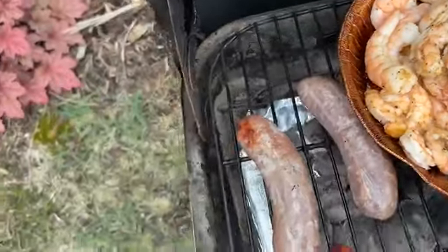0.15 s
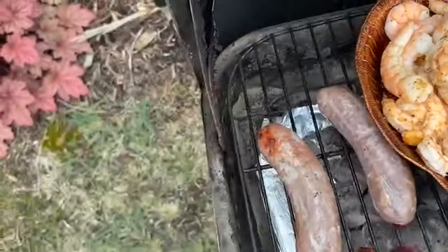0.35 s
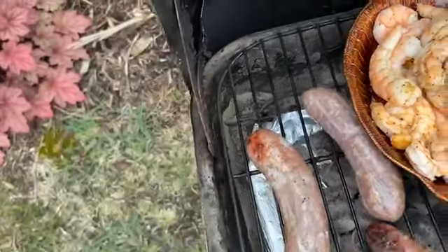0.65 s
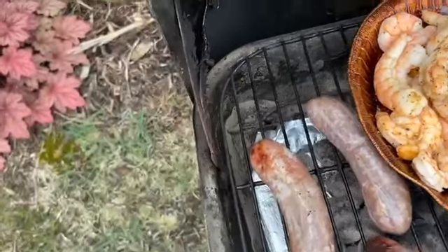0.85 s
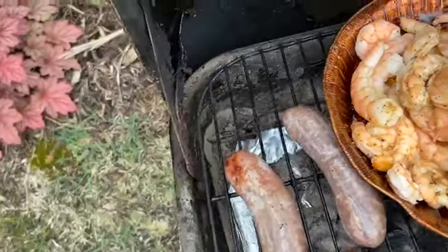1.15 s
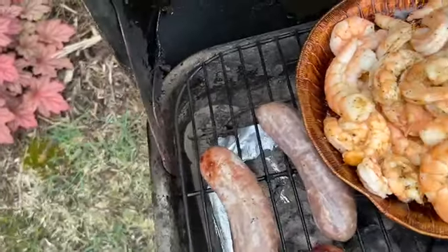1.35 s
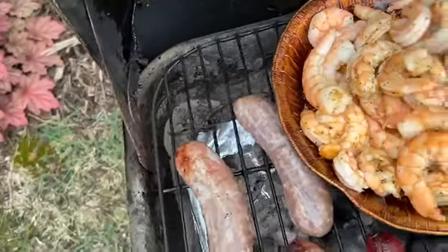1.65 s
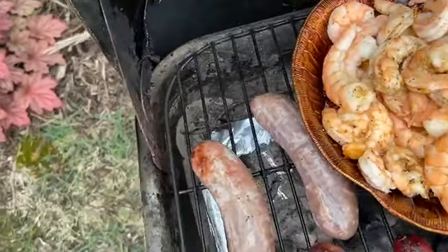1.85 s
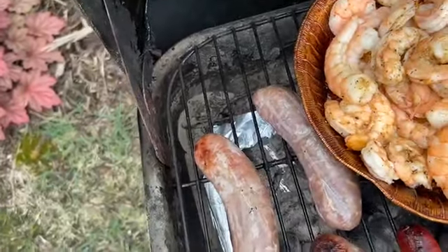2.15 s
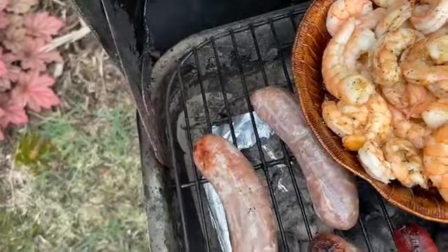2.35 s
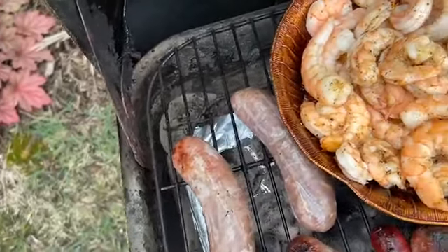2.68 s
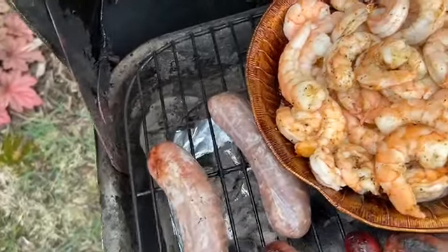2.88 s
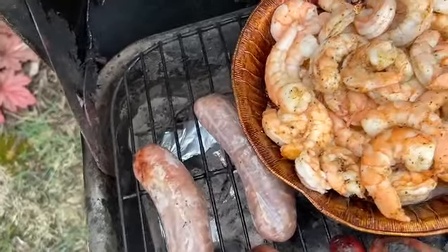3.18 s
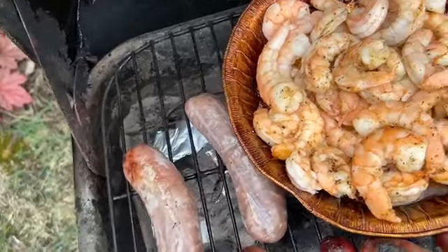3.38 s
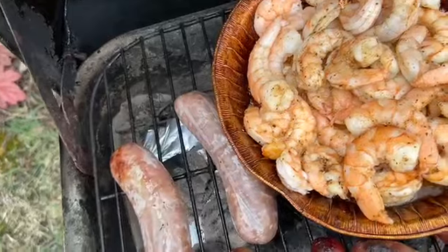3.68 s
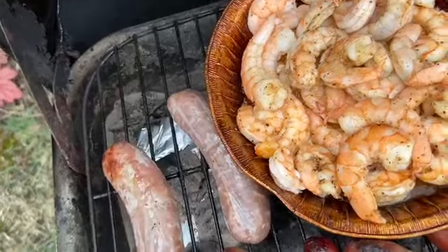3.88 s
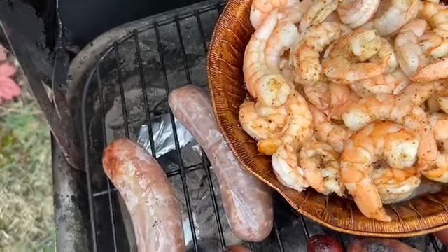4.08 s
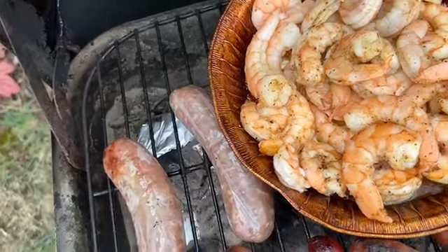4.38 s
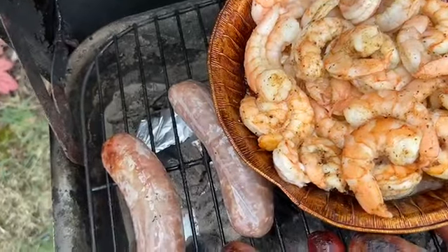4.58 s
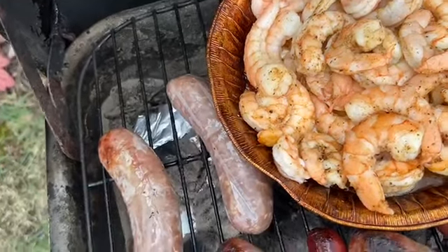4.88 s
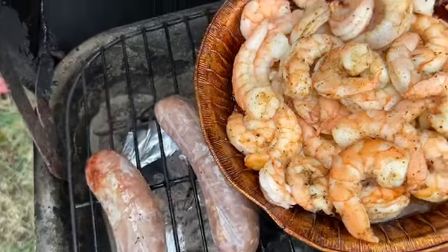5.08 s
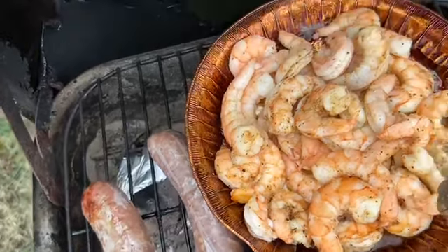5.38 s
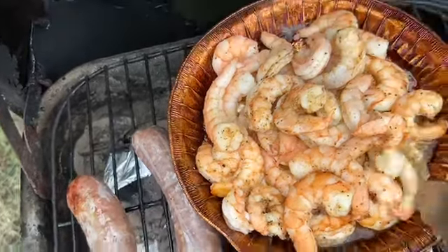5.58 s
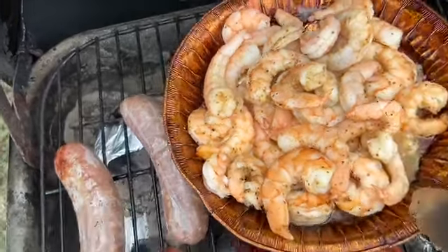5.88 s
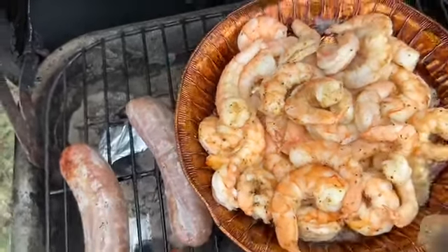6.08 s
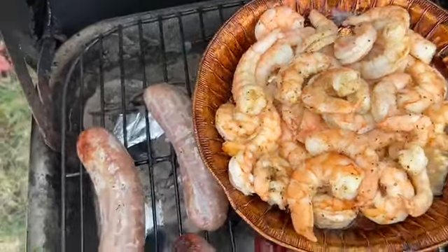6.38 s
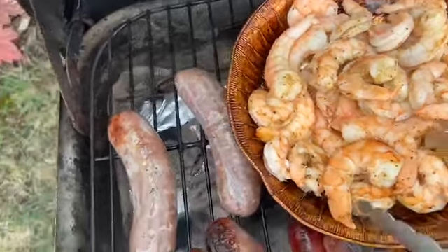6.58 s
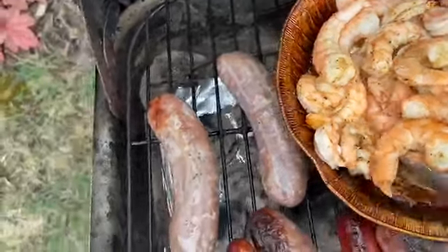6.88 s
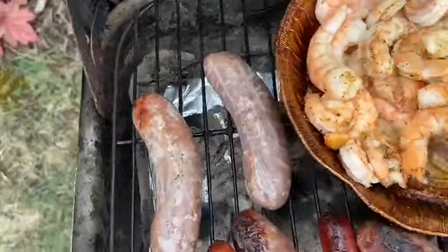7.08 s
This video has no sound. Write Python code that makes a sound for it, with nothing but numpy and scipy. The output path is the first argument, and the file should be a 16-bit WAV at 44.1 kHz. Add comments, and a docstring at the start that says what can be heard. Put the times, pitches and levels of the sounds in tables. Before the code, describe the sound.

A low machine hum and soft outdoor rumble run throughout, with faint charcoal-grill sizzle and occasional spits of fat. Tongs knock the grate lightly, then scrape and clang it harder, ringing the sheet-metal bowl. Later, wet rubs and short hollow clacks come from a dish of shrimp very close to the microphone, the loudest past the middle, with another strong clack near the end.

```python
"""A machine hums throughout over a low outdoor rumble, and sausages sizzle faintly on a small charcoal
grill. Metal tongs knock and scrape on the grate, which rings the sheet-metal bowl; this alternates with
rubs and clacks in a dish of shrimp close to the microphone. Fat spits now and then.
Hum is made of sine waves, sizzle and spits of tiny clicks and noise bursts; struck or rubbed metal is
made of fading sine waves and noise, set going by single blows or streams of random clicks."""
import sys
import numpy as np
from scipy import signal
from scipy.fft import rfft, irfft, next_fast_len
from scipy.io import wavfile
from scipy.ndimage import uniform_filter1d, map_coordinates

SR = 44100
rng = np.random.default_rng(int(sys.argv[2]) if len(sys.argv) > 2 else 0)


def wav_out(sig):
    """Save sig, one row per channel (or a flat mono array), as 16-bit PCM at SR to the path in sys.argv[1]."""
    wavfile.write(sys.argv[1], SR, np.round(np.clip(np.atleast_2d(sig).T, -1, 1) * 32767).astype(np.int16))


N = 319725
TIME = np.arange(N) / SR  # seconds
# Table levels set the balance; the functions trim, color and pan them further.
# In every table of modes, fade_s is the time to fall by 60 dB.


def undb(db):
    """Turn decibels into a gain."""
    return 10 ** (np.asarray(db) / 20)


def unit(x):
    """Scale a sound to an rms level of 1."""
    return x / np.sqrt(np.mean(x ** 2))


def at_hz(points, hz):
    """Read a curve of (frequency, value) points on a log-frequency axis."""
    f, value = np.transpose(points)
    return np.interp(np.log(np.maximum(hz, 1)), np.log(f), value)


def colour(x, points, size=8192):
    """Filter to a (pitch_hz, level_db) spectrum, with no sound before its cause (minimum phase)."""
    log_gain = at_hz(points, np.fft.rfftfreq(size, 1 / SR)) * np.log(10) / 20
    cepstrum = irfft(log_gain)
    # folding the second half onto the first puts the response after the start
    cepstrum[1:size // 2] *= 2
    cepstrum[size // 2 + 1:] = 0
    response = irfft(np.exp(rfft(cepstrum)))
    return signal.fftconvolve(x, response)[:len(x)]


def band(x, lo_hz, hi_hz, order=2):
    """Keep only the sound between two frequencies."""
    edges = [lo_hz, min(hi_hz, SR / 2 - 1)]
    return signal.sosfilt(signal.butter(order, edges, "band", fs=SR, output="sos"), x)


def walk(rate_hz):
    """A smooth random wander with an rms of 1, from rate_hz new values each second."""
    k = int(SR / rate_hz)
    steps = np.repeat(rng.standard_normal(N // k + 1), k)
    smooth = uniform_filter1d(uniform_filter1d(steps, k), k)
    return unit(smooth[:N])


def stroke(start, length, swell_db, attack_s, release_s):
    """Gain of one sliding contact: it bites, presses steadily harder or softer, then lets go."""
    t = TIME - start
    bite = 1 - np.exp(-np.maximum(t, 0) / attack_s)
    pressure = undb(swell_db * (np.clip(t / length, 0, 1) - .5))
    let_go = np.exp(-np.maximum(t - length, 0) / release_s)
    return bite * pressure * let_go


def add(track, s, sound):
    """Mix a sound into a track at time s, in seconds."""
    start = int(s * SR)
    track[start:start + len(sound)] += sound[:N - start]


def ring(modes, t):
    """Fading sine waves, the modes of struck metal; neighbours swing in opposite directions."""
    out = 0
    for k, (hz, db, fade_s) in enumerate(modes):
        out = out + (-1) ** k * undb(db - 60 * t / fade_s) * np.sin(2 * np.pi * hz * t)
    return out


def wash(bands, t):
    """Modes too dense to tell apart: octaves of noise, each dying at its own pace."""
    out = 0
    for hz, db, fade_s in bands:
        octave = band(rng.standard_normal(len(t)), hz / np.sqrt(2), hz * np.sqrt(2))
        out = out + undb(db - 60 * t / fade_s) * unit(octave)
    return out


def grains(rate_hz, spread_db):
    """Random tiny clicks, rate_hz each second on average, mostly weak with a few strong ones."""
    size = undb(spread_db * np.minimum(rng.exponential(size=N), 5))
    return unit((rng.random(N) < rate_hz / SR) * size * rng.choice([-1, 1], N))


def blow(response, db, bright_db, split_hz):
    """Shape one blow: harder contact puts more of its energy above the split frequency."""
    low = signal.sosfilt(signal.butter(4, split_hz, "low", fs=SR, output="sos"), response)
    high = signal.sosfilt(signal.butter(4, split_hz, "high", fs=SR, output="sos"), response)
    # loudest 4 ms of each part
    peak_low, peak_high = (np.sqrt(uniform_filter1d(part ** 2, size=176).max()) for part in (low, high))
    return undb(db) * (low / peak_low + undb(bright_db) * high / peak_high)


# steady tones of the machine: pitch_hz, level_db (average rms)
MACHINE_HUM = [(119.8, -48), (239.6, -82.5), (299.3, -73), (359.5, -77), (538.7, -80)]
# tone of the outdoor rumble: pitch_hz, level_db (relative)
YARD_COLOUR = [(10, -34.5), (25, -14), (50, -1), (80, 2.5), (115, 0.5), (160, -3.5), (220, -11), (310, -17),
               (420, -21.5), (540, -21), (800, -26), (1200, -30.5), (1900, -38.5), (6000, -64)]


def yard(rumble_db=-50.0, side_db=-17, waver_db=0.64):
    """A machine's sine tones waver slightly over a low rumble of coloured noise."""
    hum = 0
    for hz, db in MACHINE_HUM:
        level = np.sqrt(2) * undb(db + waver_db * walk(1.8))
        hum = hum + level * np.sin(2 * np.pi * hz * TIME + 0.059 * walk(1.4))
    mid, side = (unit(colour(rng.standard_normal(N), YARD_COLOUR)) for _ in range(2))
    # the side noise is opposite in left and right, which widens the rumble
    return hum + undb(rumble_db) * (mid + undb(side_db) * side * np.array([[1], [-1]]))


# loudness of the sizzle over time: time_s, level_db (before trim)
SIZZLE_LEVEL = [(0.0, -71.5), (0.42, -71.5), (0.6, -58), (0.91, -68), (1.39, -61), (2.3, -61.5),
                (2.6, -64.5), (3.35, -71), (4.15, -68), (4.42, -72), (4.85, -66), (5.1, -62.5), (5.23, -70),
                (5.45, -68.5), (5.72, -62), (6.24, -63.5), (6.55, -73), (7.25, -62.5)]
# loud noise bursts: start_s, level_db (before trim); the one at 3.4285 s is the bright tick
# at the top of a grate knock, the others are the loudest spits of fat
LOUD_BURSTS = [(0.4831, -30.5), (0.831, -43), (2.8397, -47), (3.4285, -34), (3.5578, -47), (4.1055, -37.5),
               (4.3151, -46.5), (4.512, -44), (4.6453, -44.5), (4.7825, -46.5), (4.8828, -47.5),
               (4.9287, -45), (5.1237, -45), (5.2803, -49.5), (6.0395, -39.5), (6.1392, -39.5),
               (6.213, -40), (6.2813, -41.5), (7.053, -40.5), (7.1714, -39.5)]
# tone of sizzle and bursts: pitch_hz, level_db (relative)
SIZZLE_COLOUR = [(300, -29), (1200, 2), (1900, -6.5), (2300, 2), (3300, 4), (3650, 1.5), (4300, 3),
                 (6200, -2), (8000, 2.5), (11500, -5), (16000, 4)]


def sizzle_and_bursts(gain_db=4, burst_db=-2, burst_s=0.0051, flutter_db=0.76, crackle_db=-9,
                      small_spit_db=-51, small_spread_db=2, count=20):
    """Bursting beads of fat, a sparser crackle, small spits at random and single louder bursts."""
    s, db = np.transpose(SIZZLE_LEVEL)
    t = TIME[:SR // 20]
    # a snap, then its scatter inside the bowl
    snap = (1 - np.exp(-t / 0.00039)) * (np.exp(-t / burst_s) + 0.091 * np.exp(-t / 0.0128))
    pops = np.abs(grains(rate_hz=40, spread_db=1.5))
    crackle = signal.fftconvolve(pops, snap)[:N] * rng.standard_normal(N)
    beads = grains(rate_hz=6200, spread_db=4.0)
    out = beads + undb(crackle_db) * unit(crackle)
    out *= undb(np.interp(TIME, s, db) + gain_db + flutter_db * walk(28))
    small_spits = [(when * TIME[-1], small_spit_db + small_spread_db * (2 * size - 1))
                   for when, size in rng.random((count, 2))]
    for s, db in list(LOUD_BURSTS) + small_spits:
        add(out, s, undb(db + burst_db) * snap * rng.standard_normal(len(t)))
    return colour(out, SIZZLE_COLOUR)


# tongs drag along the bars: start_s, length_s, level_db (before trims), swell_db (over the stroke)
GRATE_DRAGS = [(1.18, 0.059, -43, 3), (1.244, 0.026, -32, 17), (1.266, 0.04, -33, 3.5)]
# tone of the dragging rasp: pitch_hz, level_db (relative)
DRAG_COLOUR = [(100, -7), (300, -9), (1400, -4), (2000, -10.5), (3200, -7.5), (5500, -10.5), (8000, -8),
               (11000, -16.5), (16000, -13.5)]
# ringing of grate and bowl walls, also used by the knocks: pitch_hz, level_db (relative), fade_s
GRILL_MODES = [(433.6, 3, 0.3), (467.5, 4, 0.2), (509, -7, 0.81), (581, -17, 0.11), (679, 6, 0.19),
               (732, -5.5, 0.37), (795, -8.5, 0.17), (902, -2.5, 0.085), (984, -3, 0.13),
               (1271, -13.5, 0.31), (1397, -5.5, 0.15), (1937, -12, 0.22), (2880, -11, 0.099),
               (3138, -7, 0.13), (3470, -19, 0.15), (4080, -2.5, 0.067)]
# the crowd of weaker sheet-metal modes, also for the knocks: pitch_hz, level_db (relative), fade_s
GRILL_WASH = [(393, 0.5, 0.34), (850, -9, 0.36), (1590, -10, 0.25), (3060, -3, .13), (6800, -7.5, 0.14),
              (13200, -25, 0.36)]
# deep ringing of the grill bowl, also for the knocks: pitch_hz, level_db (relative), fade_s
BOWL_MODES = [(184.4, -1, 0.56), (205, 1, 0.8), (236.4, 1, 0.94), (316.3, 8, 0.31), (331, 10.5, 0.19),
              (348, -22, 0.54)]


def grate_drag(rasp_db=11, walls_db=-2, wash_db=3, deep_db=-9, attack_s=0.004, release_s=0.013):
    """Steel sticks and slips along the bars; the bowl rings on behind the rasp."""
    t = TIME[:SR]
    strokes = [undb(db) * stroke(s, length, swell_db, attack_s, release_s)
               for s, length, db, swell_db in GRATE_DRAGS]
    press = np.max(strokes, axis=0)
    slips = grains(rate_hz=8400, spread_db=2.5) * undb(1.5 * walk(120)) * press
    walls = unit(ring(GRILL_MODES, t)) + undb(wash_db) * unit(wash(GRILL_WASH, t))
    deep = ring(BOWL_MODES, t)
    bowl = undb(walls_db) * walls / np.linalg.norm(walls) + undb(deep_db) * deep / np.linalg.norm(deep)
    rung = signal.fftconvolve(band(slips, 110, 4500, order=1), bowl)[:N]
    return undb(rasp_db) * colour(slips, DRAG_COLOUR) + rung


# knocks on the grate: start_s, body_db (before trim), then levels relative to the body, before trims: #
# clatter_db (bright part), boom_db (whole grill), bowl_db (low ring); spot_hz (favoured by the struck spot); #
# all rows are tongs knocking, except the last at 7.172 s: the dish pressed down on the grill, a soft thud with
# a deep boom
GRATE_KNOCKS = [(0.4447, -29.5, -3.5, -7, -8.5, 920), (0.503, -25.5, -12.5, -14, -13.5, 870),
                (1.4712, -17, -5, -22.5, -15.5, 630), (1.504, -18, -6, -12.5, -21.5, 663),
                (2.942, -31, -27, -36, -3.5, 330), (3.395, -38, -10, -5, -6.5, 330),
                (3.428, -31, -10, -35, -5.5, 355), (7.152, -31.5, -23.5, -28, -11, 640),
                (7.172, -57.5, -11, 23, -10, 320)]
BOOM_HZ, BOOM_FADE_S = 106.1, 0.85
SPOT_DB, SPOT_SPAN = 2.5, 1.25  # lift of the favoured modes; frequency ratio over which it fades


def grate_knocks(gain_db=-2, bright_db=2, chatter_s=0.019, chatter_db=-4, wash_db=-1, swell_s=0.0018,
                 crack_db=-8, crack_s=0.0042, tick_db=-12, boom_db=-4, deep_db=-8):
    """The tips crack on the bars, the loose grate chatters on its rests and the bowl rings."""
    out, t = np.zeros(N), TIME[:SR]
    walls, deep = ring(GRILL_MODES, t), ring(BOWL_MODES, t)
    boom = ring([(BOOM_HZ, 0, BOOM_FADE_S)], t)
    for s, db, hard_db, heavy_db, low_db, spot_hz in GRATE_KNOCKS:
        chatter = band(rng.standard_normal(len(t)) * np.exp(-t / chatter_s), 660, 14500)
        # a single click is the first hit; noise follows as chatter
        force = undb(chatter_db) * chatter / np.linalg.norm(chatter) + (t == 0)
        body = signal.fftconvolve(force, walls)[:len(t)]
        crack = band(rng.standard_normal(len(t)) * np.exp(-t / crack_s), 330, 4200, order=1)
        tick = band(rng.standard_normal(len(t)) * np.exp(-t / crack_s), 3400, 16000)
        contact = undb(crack_db) * unit(crack) + undb(tick_db) * unit(tick)
        response = unit(body) + undb(wash_db) * unit(wash(GRILL_WASH, t)) + contact
        # each spot on the grate drives some modes more than others
        response = colour(response, [(spot_hz / SPOT_SPAN, 0), (spot_hz, SPOT_DB), (spot_hz * SPOT_SPAN, 0)])
        # the bowl takes a few milliseconds to pick up the motion of the grate
        swell = 1 - np.exp(-(t / swell_s) ** 1.1)
        lows = undb(db + heavy_db + boom_db) * boom + undb(db + low_db + deep_db) * deep
        knock = blow(response * swell, db + gain_db, hard_db + bright_db, split_hz=1980)
        add(out, s, knock + lows * swell)
    return out


# strokes in the dish: start_s, length_s, body_db (before trim), swell_db (over the stroke),
# then levels relative to the body, before trims: hiss_db, squeak_db (blades), groan_db (arms);
# the one at 5.852 s is the low body of the clack at 5.855 s, in the others the tongs rub
DISH_STROKES = [(0.12, 0.13, -63, -9, -2, -17, -13), (2.377, 0.025, -42.5, -2, -6.5, 0, -4),
                (2.411, 0.067, -40.5, -5, -13, -13.5, -9), (2.516, 0.06, -51, 5.5, -7, -3.5, 5.5),
                (4.051, 0.07, -58.5, 5, -0.5, -5, -3), (5.667, 0.12, -44, 8.5, -2, -5, -3),
                (5.795, 0.183, -42, -3, -9.5, -6.5, -17), (5.852, 0.0144, -27.5, -10, -27, -25, -28),
                (5.975, 0.071, -50, -3, -12, -12, -20), (6.048, 0.043, -47.5, -18, -2.5, -18, -20),
                (6.671, 0.023, -32.5, 0, -6, -6.5, -1.5), (6.734, 0.06, -38.5, -7, -7.5, -24, -6),
                (6.879, 0.016, -40, 5, -27.5, -26, -14), (6.917, 0.091, -33.5, 6, -15, -20, 0),
                (7.033, 0.1, -50.5, -8, -6, -9, -21)]
# ringing of a stroke in the dish: pitch_hz, level_db (relative), fade_s
STROKE_MODES = [(328, -6, 0.033), (580, -0.5, 0.026), (868, -1, 0.026), (1221, 1, 0.023),
                (1410, -11, 0.013), (1600, -9, 0.032), (2150, -12, 0.0076)]
# ringing of the tong blades: pitch_hz, level_db (relative), fade_s
BLADE_MODES = [(2810, -10, 0.046), (3350, 0.5, 0.029), (3920, -5.5, 0.028), (4200, -12.5, 0.065)]
# ringing of the long arms of the tongs: pitch_hz, level_db (relative), fade_s
ARM_MODES = [(1130, -1.5, 0.061), (1290, -6, 0.03)]
# tone of the wet hiss: pitch_hz, level_db (relative)
HISS_COLOUR = [(300, -7.5), (1500, 4), (3500, -1.5), (5500, -5), (8000, -8), (11000, -15), (16000, -16.5)]


def dish_strokes(body_db=-1, hiss_db=2, squeak_db=-2, groan_db=-1, judder_db=1.5, shift_db=2.44,
                 attack_s=0.004, release_s=0.014):
    """Uneven slips of the tips in wet shrimp hiss and ring the dish, the blades (squeak) and arms (groan)."""
    t = TIME[:SR // 10]
    slips = grains(rate_hz=3200, spread_db=2.5) * undb(judder_db * walk(130))
    rings = [unit(signal.fftconvolve(slips, ring(modes, t))[:N])
             for modes in (STROKE_MODES, BLADE_MODES, ARM_MODES)]
    # the resonances bend a little and trade strength as the point of contact moves
    bend = [(TIME + 0.000726 * walk(19)) * SR]
    body, squeak, groan = (map_coordinates(part, bend, order=3) * undb(shift_db * walk(45))
                           for part in rings)
    hiss = unit(colour(slips, HISS_COLOUR))
    gains = np.zeros((4, N))
    for s, length, db, swell_db, wet_db, grip_db, arm_db in DISH_STROKES:
        parts_db = np.array([[body_db], [wet_db + hiss_db], [grip_db + squeak_db], [arm_db + groan_db]])
        mix = undb(db + parts_db)
        # where strokes overlap, the stronger one counts
        gains = np.maximum(gains, mix * stroke(s, length, swell_db, attack_s, release_s))
    return np.sum(gains * [body, hiss, squeak, groan], axis=0)


# tongs clack on the dish: start_s, body_db (before trim), crack_db (bright part, relative, before trim)
DISH_CLACKS = [(0.72, -43.5, -31), (2.422, -38, -24), (4.105, -47.5, -3), (5.511, -27.5, -8),
               (5.599, -31.5, -6.5), (5.618, -4.5, -13), (5.621, -15.5, -5.5), (5.625, -29, -23),
               (5.774, -31, -22), (5.855, -32, -30), (6.086, -31.5, -19.5), (6.647, -13.5, -16),
               (6.677, -21, -21), (6.701, -33.5, -8), (6.747, -31.5, -36)]
# ringing of tongs against the dish: pitch_hz, level_db (relative), fade_s
DISH_MODES = [(391, -25, 0.012), (555, -3, 0.029), (900, -11.5, 0.064), (1208, -1, 0.039),
              (1380, -3, 0.048), (1523, -3.5, 0.025), (2240, -13, 0.033), (2370, -9, 0.018),
              (3040, -10.5, 0.017), (3380, -19, 0.03), (4020, -12.5, 0.014), (4830, -15.5, 0.014),
              (8100, -22.5, 0.028)]
# the crowd of weaker dish modes: pitch_hz, level_db (relative), fade_s
DISH_WASH = [(400, -8.5, 0.12), (750, -3, 0.051), (1720, 3.5, 0.062), (3400, -6.5, 0.016),
             (6400, -2, 0.024), (11700, -2, 0.016)]


def dish_clacks(gain_db=-3, bright_db=3, wash_db=-8, yard_db=-30, yard_fade_s=0.14, bite_s=0.0011):
    """Short hollow clacks, damped by the food; the yard returns a faint tail."""
    out, t = np.zeros(N), TIME[:SR // 3]
    dish = unit(ring(DISH_MODES, t))
    for s, db, hard_db in DISH_CLACKS:
        tail = band(rng.standard_normal(len(t)), 300, 4000, order=1)
        tail *= np.exp(-np.log(1000) * t / yard_fade_s)  # down 60 dB after yard_fade_s
        response = dish + undb(wash_db) * unit(wash(DISH_WASH, t)) + undb(yard_db) * unit(tail)
        # the tips bite through a film of marinade
        contact = 1 - np.exp(-(t / bite_s) ** 2)
        add(out, s, blow(response * contact, db + gain_db, hard_db + bright_db, split_hz=3770))
    return out


# level difference between the two microphone ports: pitch_hz, left_minus_right_db
PORT_BALANCE = [(110, -4), (400, 0), (800, -6), (1200, 1), (1750, -1.5), (2400, 3), (5000, 0.5), (7500, 0),
                (15000, -1.5)]
# phase difference between the ports: pitch_hz, left_lead_radians
PORT_PHASE = [(50, 0), (600, -.25), (1700, -.65), (2800, .65), (4500, .2), (5900, -.8), (6800, .45),
              (8150, -.2), (9400, -3.1), (10000, -3.2), (11200, -6.2), (12100, -6.4), (13100, -9.3),
              (13600, -9.5), (15000, -12.5)]


def ports(x, pan_db, scatter_db):
    """A near sound reaches the two ports with different level and phase; close reflections differ too."""
    t = TIME[:SR // 25]
    reflections = rng.standard_normal(len(t)) * np.exp(-t / 0.0064)
    scattered = signal.fftconvolve(x, reflections / np.linalg.norm(reflections))[:N]
    side = undb(scatter_db) * band(scattered, 490, 6100, order=2)
    size = next_fast_len(N + 4096)
    hz = np.fft.rfftfreq(size, 1 / SR)
    # each port gets half of the difference, in opposite directions
    half = undb(at_hz(PORT_BALANCE, hz) / 2) * np.exp(.5j * at_hz(PORT_PHASE, hz))
    left, right = rfft(x + side, size) * half, rfft(x - side, size) / half
    pair = irfft(np.array([left, right]), size)[:, :N]
    return pair * undb(pan_db * np.array([[.5], [-.5]]))


# where the tongs are in the dish: time_s, left_minus_right_db (added to the port balance)
DISH_PAN = [(2.4, -0.5), (5.6, 2), (6.1, 0.5), (6.65, 0)]
# gain on the close reflections, before their band filter
GRILL_SCATTER_DB, DISH_SCATTER_DB = -6, -16


def scene(yard_pan_db=-2.0):
    """The grill below, the dish close by, the yard all round."""
    grill = ports(grate_knocks() + grate_drag(), pan_db=0.0, scatter_db=GRILL_SCATTER_DB)
    dish_pan_db = np.interp(TIME, *np.transpose(DISH_PAN))
    dish = ports(dish_clacks() + dish_strokes(), pan_db=dish_pan_db, scatter_db=DISH_SCATTER_DB)
    bursts = ports(sizzle_and_bursts(), pan_db=1.4, scatter_db=GRILL_SCATTER_DB)
    background = yard() * undb(yard_pan_db * np.array([[.5], [-.5]]))
    return grill + dish + bursts + background


# response shared by both microphone ports: pitch_hz, level_db
PORT_COLOUR = [(20, -1.5), (8500, -4), (10000, -2.5), (12500, -5.5), (14200, 0), (15400, 1.5), (15700, 0),
               (16100, -25)]
TOP_HZ = 16400  # upper limit of the sound


def record(dry):
    """The microphone dips the treble slightly and lifts its top before the cutoff."""
    heard = np.array([colour(channel, PORT_COLOUR) for channel in dry])
    return signal.sosfilt(signal.ellip(8, .2, 70, TOP_HZ, fs=SR, output="sos"), heard)


dry = scene()
out = record(dry)
wav_out(out)
```